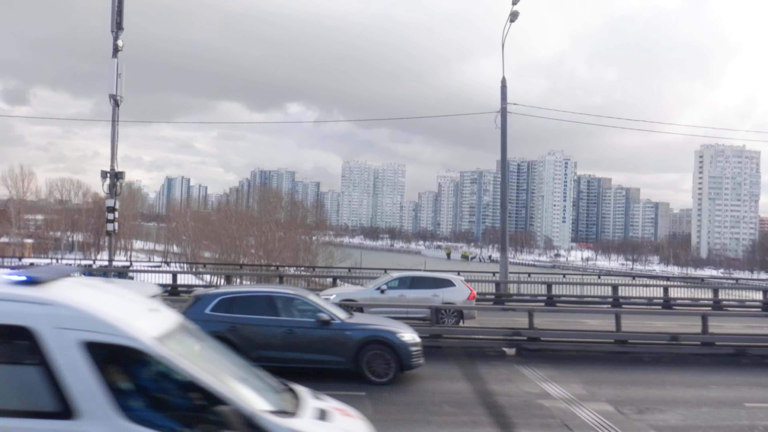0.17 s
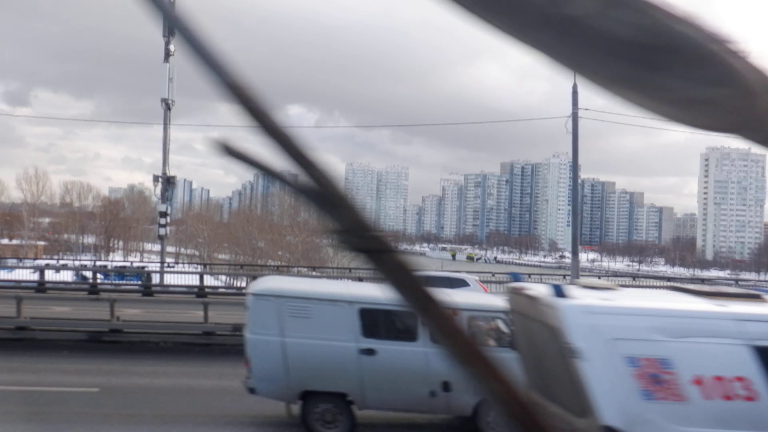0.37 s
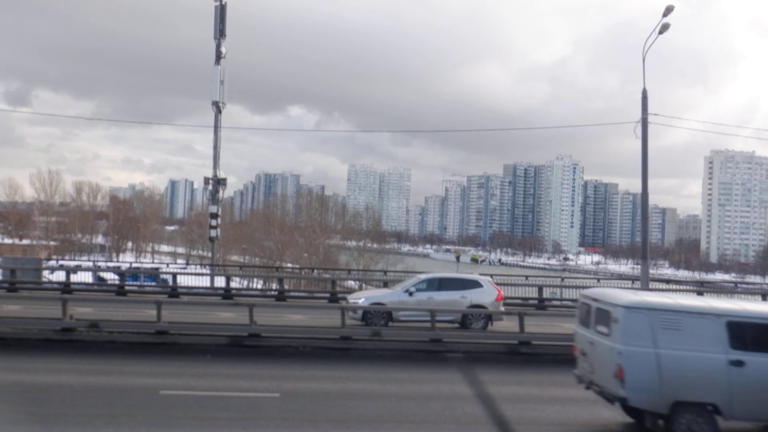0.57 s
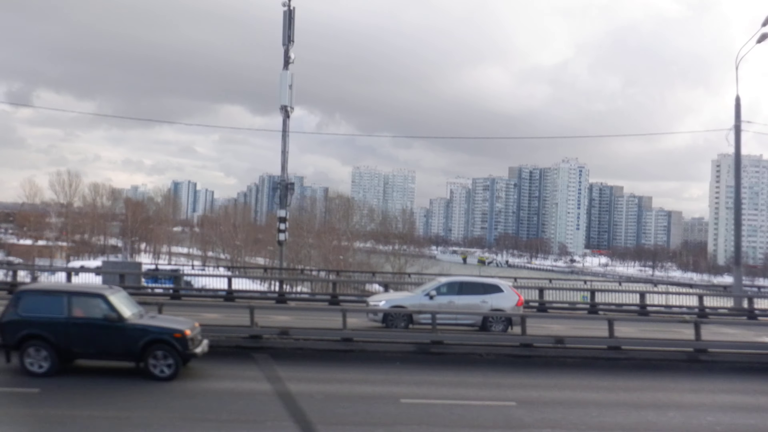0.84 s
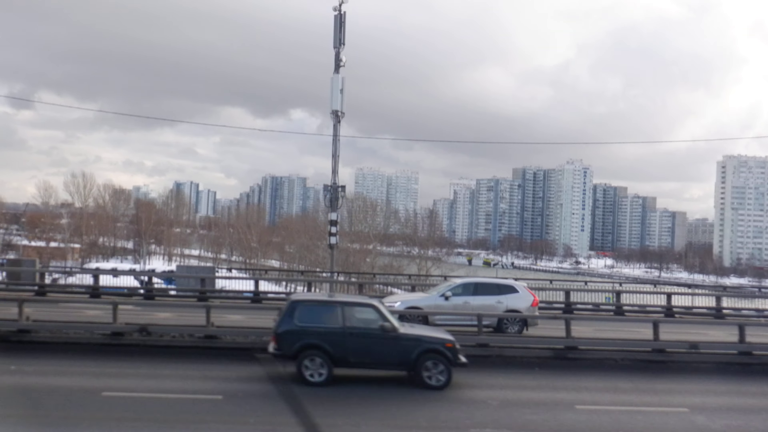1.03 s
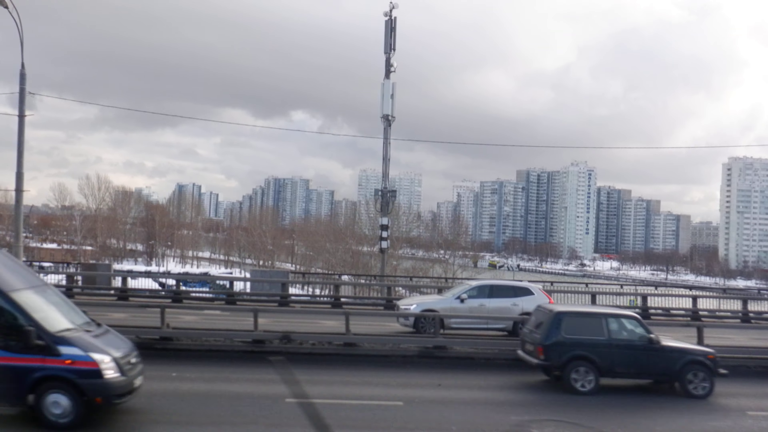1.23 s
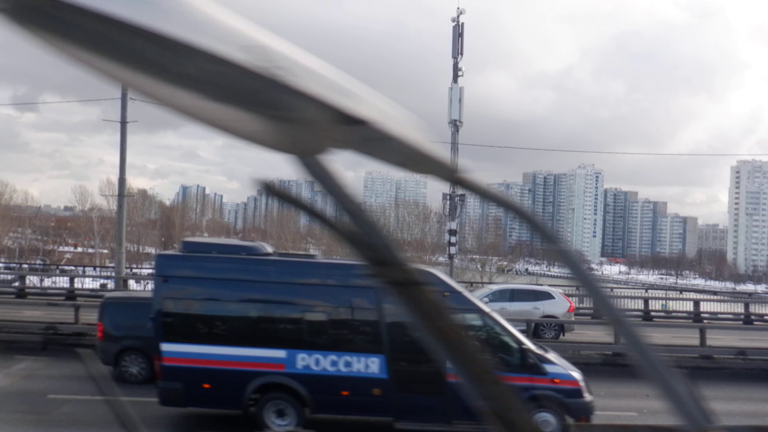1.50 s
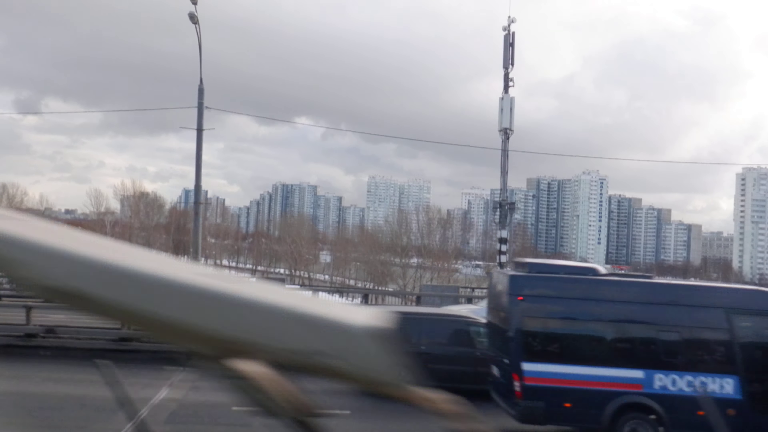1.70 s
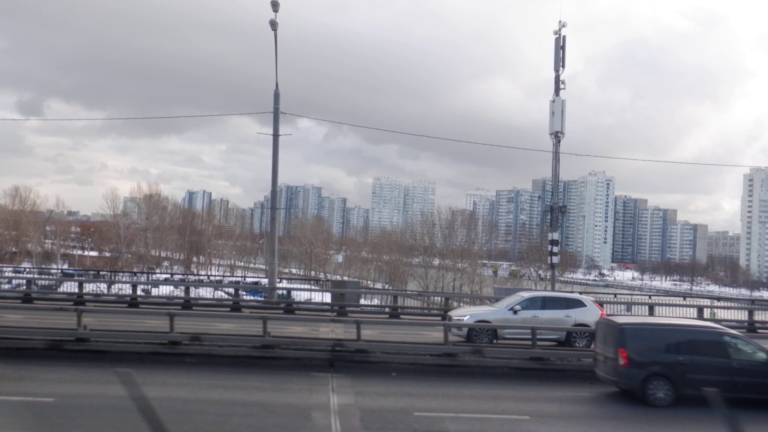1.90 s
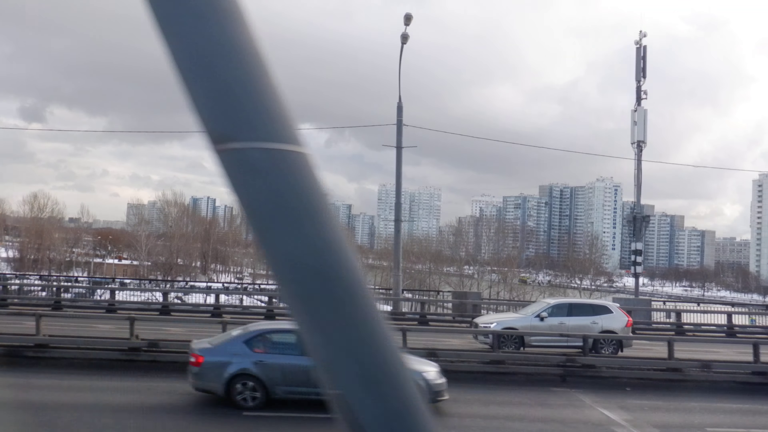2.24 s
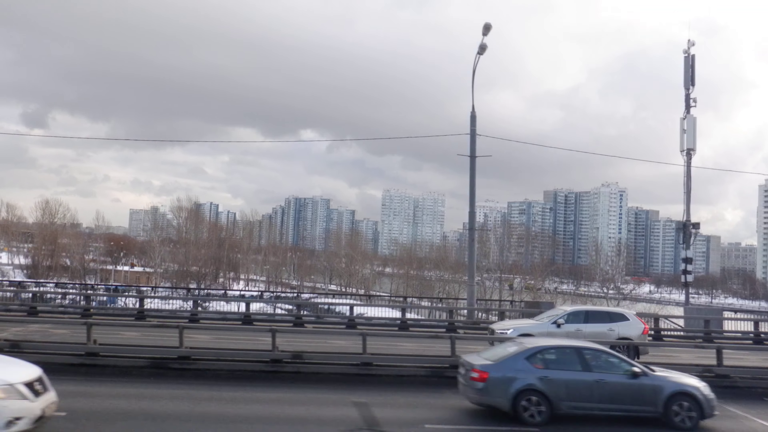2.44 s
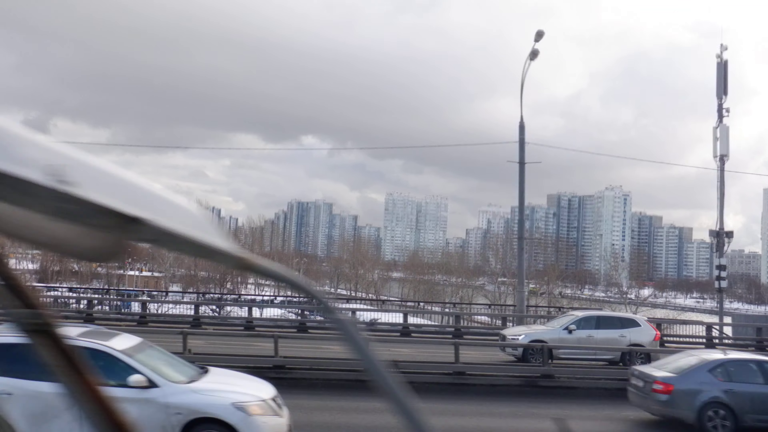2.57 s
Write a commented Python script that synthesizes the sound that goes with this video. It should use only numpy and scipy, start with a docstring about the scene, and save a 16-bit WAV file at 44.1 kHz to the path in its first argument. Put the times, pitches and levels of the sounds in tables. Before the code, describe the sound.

A train rolls steadily, heard inside the car: deep rumble, low drone and softer midrange rush. A floor boom and clatter come at once, with stronger hits around 0.1, 0.75-0.9, 1.55 and 2.4 seconds and smaller thuds between. A loose fitting ticks sharply twice near 0.4 and harder at 0.55. Very faint high ticks pulse nearby; loud booms overload and briefly duck the sound.

```python
"""A steady rumble and rush fill a moving train car, and a floor boom with clatter comes at once.
More booms and clatter follow as axle pairs cross rail joints: shaken resonances and noise bursts.
A faint high tick near the microphone, a puff of high noise, keeps to a regular beat with gaps.
A loose fitting ticks three times: a sharp contact, a short ring of sines and a noisy tail.
Loud booms overload the recorder: it turns the level down, then squeezes the highest peaks."""
import sys
import numpy as np
from scipy import signal
from scipy.io import wavfile
from scipy.ndimage import uniform_filter1d

SR = 44100
rng = np.random.default_rng(int(sys.argv[2]) if len(sys.argv) > 2 else 0)


def waveform_to_disk(signal):
    """Save audio, clipped to [-1, 1], as 16-bit WAV at the path in sys.argv[1]."""
    frames = np.transpose(np.atleast_2d(signal))
    scaled = np.clip(frames, -1, 1) * 32767
    samples = np.round(scaled).astype(np.int16)
    wavfile.write(sys.argv[1], SR, samples)


N = 121275
T = np.arange(N) / SR

# All levels in the tables are those before the recorder.
# Wheels on rails over time: start_s, rumble_level_db, rush_level_db, drone_level_db
ROLLING_LEVELS = [(0.0, -17.5, -33.5, -21.5), (0.1, -18.5, -32.5, -27), (0.3, -22, -36, -27),
                  (0.53, -22.5, -33, -21), (0.56, -20, -33.5, -30), (0.73, -21.5, -32, -18),
                  (0.83, -12.5, -30.5, -38), (0.9, -18.5, -33, -23), (1.0, -24.5, -38, -27),
                  (1.26, -20.5, -34.5, -22.5), (1.44, -17, -30.5, -22.5), (1.81, -20.5, -34, -26),
                  (1.83, -24, -37.5, -19.5), (1.9, -19, -35.5, -27.5), (2.05, -17.5, -32, -19),
                  (2.17, -17, -32.5, -26.5), (2.38, -17, -31, -21), (2.43, -20, -35, -27.5),
                  (2.73, -17, -34, -30.5), (2.75, -22, -34, -23)]
# Tone color of the low rumble: pitch_hz, level_db (per Hz)
RUMBLE_TONE = [(15, -25.5), (30, -25), (60, -8.5), (100, -9), (160, 1), (220, 4), (300, -2.5), (400, -8),
               (550, -10.5), (750, -22), (1200, -80.5)]
# Tone color of the higher rush: pitch_hz, level_db (per Hz)
RUSH_TONE = [(300, -13), (600, 3), (900, 6), (1600, -0.5), (1900, -4), (2500, -4), (3200, -3.5),
             (3700, -11.5), (4200, -19.5), (4800, -17.5), (6200, -19.5), (7200, -36.5), (8500, -40),
             (10000, -46), (16000, -54.5)]
# Faint hiss over time, before its treble is softened: start_s, level_db
HISS_LEVELS = [(0.03, -82), (0.18, -85.5), (0.52, -83.5), (1.07, -85), (1.42, -82), (1.55, -84.5),
               (1.76, -91), (2.25, -82), (2.41, -89), (2.72, -88)]
# Booms of the floor: start_s, level_db, pitch_hz, width_hz (of each resonance), hold_s (rise included)
FLOOR_BOOMS = [(.0, -17, 284, 109.6, 0.02), (0.081, -9, 205, 150, 0.03), (0.126, -11, 270, 110, 0.048),
               (0.291, -18, 255, 150, 0.048), (.455, -16.5, 191, 110, 0.019),
               (0.606, -20.5, 403, 152, 0.024), (0.73, -12, 235, 150, 0.023),
               (0.772, -10.5, 223, 109, 0.031), (0.878, -10, 238, 149, 0.041), (.92, -15, 204, 151, 0.079),
               (1.26, -13.5, 153, 110, 0.056), (1.413, -15.5, 225, 91, 0.042),
               (1.546, -6.5, 238.6, 109.5, 0.042), (1.555, -17, 412, 250, .02),
               (1.701, -13.5, 271, 200, 0.037), (1.971, -14.5, 206.5, 112, 0.042),
               (2.027, -20, 290, 200, 0.01), (2.253, -16.5, 186, 108, 0.024),
               (2.309, -16.5, 190, 111, 0.12), (2.37, -13.5, 380, 300, 0.016), (2.386, -8, 228, 130, 0.027),
               (2.514, -12, 245, 106.7, 0.043), (2.664, -17, 234, 107, 0.044),
               (2.705, -17.5, 242, 110, 0.038)]
# Clatter at the rail joints: start_s, level_db (upper part), rise_s, fade_s (to fall 60 dB),
# mid_db (lower part, compared with the upper part)
JOINT_CLATTER = [(.0, -31, 0.0035, 0.6, -19), (0.094, -28, 0.011, 0.33, -9),
                 (0.131, -25, 0.0051, 0.28, 6.5), (0.273, -32.5, 0.016, .5, 8),
                 (0.589, -34.5, 0.018, 0.23, 8), (0.734, -36.5, .008, 1, 11), (.785, -28, 0.0098, 0.88, -3),
                 (.88, -34, 0.012, 0.42, -4), (.94, -31.5, 0.017, 0.44, 4.5),
                 (1.238, -30, 0.036, 0.58, 3.5), (1.41, -53.5, .03, .5, -2),
                 (1.551, -29.5, 0.0098, 0.38, 7), (1.698, -29, 0.019, 0.46, -3),
                 (2.018, -39, 0.013, 0.16, 12.5), (2.148, -40.5, .03, 0.3, 2),
                 (2.373, -23, 0.024, 0.32, -8), (2.52, -28.5, .028, 0.45, -2.5)]
# Tone color of the clatter: pitch_hz, level_db (per Hz)
CLATTER_COLOR = [(300, 4.5), (500, 2), (900, 0), (1600, -0.5), (1900, -4), (3200, 0), (3700, -9),
                 (4200, -17), (4800, -13), (6200, -19), (7200, -31), (8500, -44), (10000, -55.5),
                 (16000, -72)]
# Faint high ticks: start_s, level_db
HIGH_TICK_TIMES = [(0.0204, -67), (0.0872, -62.5), (0.2892, -70), (0.4204, -71), (0.6878, -68.5),
                   (0.8205, -68), (0.8864, -71), (0.9547, -69), (1.0216, -68), (1.0874, -68), (1.1543, -69),
                   (1.2875, -64.5), (1.4207, -62.5), (1.6871, -74), (1.8206, -67), (1.8871, -72),
                   (1.956, -69), (2.0238, -69), (2.0877, -66), (2.155, -63.5), (2.287, -66), (2.6893, -71)]
# Ticks of the loose fitting: start_s, level_db, contact_db (compared with that level)
FITTING_TICKS = [(.3968, -9, -45), (.4138, -14, -50), (.5475, -6, -19)]
# Tones the fitting rings with: pitch_hz, level_db (compared with each other), fade_s (to fall 60 dB)
FITTING_TONES = [(2250, -1, .015), (2850, 1, .035), (3400, -1, .012), (3950, -2, .01), (4750, 0, .011),
                 (5300, -3, .01), (5900, 2, .009), (6600, -6, .007), (8000, -17, .008)]
# Centers of narrow notches in the finished sound: pitch_hz
NOTCH_PITCHES = [1786, 3428, 3571, 3643, 4286, 4500]

DRONE_TOP_HZ, HISS_TOP_HZ = 140.5, 14000
BOOM_TOP_HZ, BOOM_RISE_S, BOOM_FALL_S = 1530, 0.0037, 0.023
STEADY = 0.41  # how even the shudder is, 0 to 1
CLATTER_SPLIT_HZ = 1170  # between the lower and upper parts
PANEL_HZ, PANEL_WIDTH_HZ, PANEL_DB = 1624, 59, -3.5  # a panel that rings with the clatter
HIGH_TICK_HZ, HIGH_TICK_WIDTH_HZ, HIGH_TICK_S = 11600, 900, 0.008
TICK_LOW_HZ, TICK_TOP_HZ = 1500, 6800
RATTLE_DB, RATTLE_FADE_S = -27, 0.035  # noisy tail, compared with the peak of the ring
DUCK_FROM_DB, DUCK_SHARE = -12, 0.26  # share of the excess dB that is turned down
MEMORY_FALL_DB_PER_S = 18  # how fast the recorder forgets a loud moment
KNEE, SQUEEZE = 0.72, 0.55  # sample size where squeezing starts; share kept above it
NOTCH_WIDTH_HZ, EDGE_HZ = 40, 15850


def gain_of(db):
    """Turns decibels into a multiplier for the wave."""
    return 10 ** (np.asarray(db) / 20)


def evened(x):
    """Scales a sound so its average strength (rms) is 1."""
    return x / np.sqrt(np.mean(x ** 2) + 1e-20)


def band(x, order, low_hz, high_hz):
    """Keeps the sound between two pitches and weakens the rest."""
    return signal.sosfilt(signal.butter(order, [low_hz, high_hz], "band", fs=SR, output="sos"), x)


def noise(tone, patchy_db, size=1024):
    """Noise of a given tone color, with patches that drift in time and pitch."""
    frames, hz = 4 * N // size + 5, np.fft.rfftfreq(size, 1 / SR)
    a, b, patch = rng.standard_normal((frames, len(hz), 3)).T
    patch = uniform_filter1d(patch, size=8, axis=0)
    patch = evened(uniform_filter1d(patch, size=8, axis=1))
    tone_hz, tone_db = np.transpose(tone)
    color_db = np.interp(np.log(hz + 1), np.log(tone_hz), tone_db)
    spectrum = (a + 1j * b) * gain_of(color_db[:, None] + patchy_db * patch)
    x = signal.istft(spectrum, nperseg=size, noverlap=size * 3 // 4)[1]
    return evened(x[:N])


def resonate(x, hz, width_hz):
    """One resonance: lets through sound near one pitch, with gain 1 at its center."""
    turn = np.exp(2j * np.pi * hz * np.arange(len(x)) / SR)
    r = np.exp(-np.pi * width_hz / SR)
    # shift the pitch down to zero, smooth, and shift it back
    return 2 * (turn * signal.lfilter([1 - r], [1, -r], x / turn)).real


def add(mix, s, sound):
    """Lays a sound into the mix at time s, cut off at the end of the mix."""
    part = mix[max(round(s * SR), 0):][:len(sound)]
    part += sound[:len(part)]


def rolling():
    """Wheels on rails: rumble and rush swell on their curves over a deep drone and faint hiss."""
    s, rumble_db, rush_db, drone_db = np.transpose(ROLLING_LEVELS)
    rumble = gain_of(np.interp(T, s, rumble_db)) * noise(RUMBLE_TONE, 0.78, size=2048)
    rush = gain_of(np.interp(T, s, rush_db)) * noise(RUSH_TONE, 1.3)
    drone = evened(band(rng.standard_normal(N), 3, 40, DRONE_TOP_HZ))
    drone = gain_of(np.interp(T, s, drone_db)) * drone
    hiss = signal.lfilter(*signal.butter(1, HISS_TOP_HZ, fs=SR), rng.standard_normal(N))
    hiss = gain_of(np.interp(T, *np.transpose(HISS_LEVELS))) * hiss
    return rumble + rush + drone + hiss


def booms():
    """The floor shudders briefly around one pitch: rise, hold, quick fall."""
    out, t = np.zeros(N), np.arange(SR // 4) / SR
    warmup = 2000  # samples for the resonances to settle, then cut away
    for s, db, hz, width_hz, hold_s in FLOOR_BOOMS:
        shake = rng.standard_normal(len(t) + warmup)
        shake = resonate(resonate(shake, hz, width_hz), hz, width_hz)
        # partly level out the swings in strength
        swing = abs(signal.hilbert(evened(shake)))
        shake = (shake / (swing + 0.22) ** STEADY)[warmup:]
        shake = shake / np.sqrt(np.mean(shake[t < hold_s] ** 2))
        rise = np.minimum(t / BOOM_RISE_S, 1)
        fall = np.exp(-np.maximum(t - hold_s, 0) / BOOM_FALL_S)
        add(out, s, gain_of(db) * shake * rise * fall)
    return band(out, 4, 60, BOOM_TOP_HZ)


def clatter():
    """Broadband bursts swell fast and fade, some heavier in the midrange; a panel rings along."""
    upper_power, lower_power, t = np.zeros(N), np.zeros(N), np.arange(SR) / SR
    for s, db, rise_s, fade_s, mid_db in JOINT_CLATTER:
        fading_db = db - 60 * np.maximum(t - rise_s, 0) / fade_s
        # twice the dB gives power, so overlapping bursts add as noise does
        power = gain_of(2 * fading_db) * np.minimum(t / rise_s, 1) ** 2
        add(upper_power, s, power)
        add(lower_power, s, power * gain_of(2 * mid_db))
    x = noise(CLATTER_COLOR, 1.1, size=512)
    x = x + gain_of(PANEL_DB) * resonate(x, PANEL_HZ, PANEL_WIDTH_HZ)
    lower = signal.sosfiltfilt(signal.butter(2, CLATTER_SPLIT_HZ, fs=SR, output="sos"), x)
    upper = x - lower
    return (np.sqrt(lower_power) * lower + np.sqrt(upper_power) * upper) / np.std(upper)


def high_ticks():
    """Short soft puffs: noise passed twice through one high resonance, swelling and fading."""
    out, t = np.zeros(N), np.arange(600) / SR
    swell = np.sin(np.pi * np.minimum(t / HIGH_TICK_S, 1))
    for s, db in HIGH_TICK_TIMES:
        puff = resonate(rng.standard_normal(len(t)), HIGH_TICK_HZ, HIGH_TICK_WIDTH_HZ)
        puff = evened(resonate(puff, HIGH_TICK_HZ, HIGH_TICK_WIDTH_HZ))
        add(out, s, gain_of(db) * puff * swell)
    return out


def fitting_ticks():
    """A loose fitting is struck: a sharp contact, a short ring of fading tones and a noisy tail."""
    out, t = np.zeros(N), np.arange(3000) / SR
    ring = sum(gain_of(db - 60 * t / fade_s) * np.sin(2 * np.pi * hz * t)
               for hz, db, fade_s in FITTING_TONES)
    ring = ring / abs(ring).max()
    contact = t == 4 / SR  # a click one sample long
    for s, db, contact_db in FITTING_TICKS:
        rattle = gain_of(RATTLE_DB - 60 * t / RATTLE_FADE_S) * rng.standard_normal(len(t))
        body = band(ring + rattle, 4, TICK_LOW_HZ, TICK_TOP_HZ)
        add(out, s, gain_of(db) * (body + gain_of(contact_db) * contact))
    return out


def scene():
    """All sources together, in one channel."""
    return (rolling() + booms() + clatter() + high_ticks() + fitting_ticks())[None]


def duck(dry):
    """Gain control: loud moments turn the level down, and it slowly comes back."""
    power_db = 10 * np.log10(abs(uniform_filter1d(dry[0] ** 2, size=900)) + 1e-12)
    # remember the loudest moment so far, letting that memory fall steadily
    fall = T * MEMORY_FALL_DB_PER_S
    remembered_db = np.maximum.accumulate(power_db + fall) - fall
    over_db = np.maximum(remembered_db - DUCK_FROM_DB, 0)
    smoother = np.hanning(1500) / np.hanning(1500).sum()
    return dry / gain_of(DUCK_SHARE * signal.oaconvolve(over_db, smoother)[:N])


def squeeze(x):
    """Overload: the part of a peak above a hard knee is made smaller."""
    squeezed = np.sign(x) * (KNEE + SQUEEZE * (abs(x) - KNEE))
    return np.where(abs(x) > KNEE, squeezed, x)


def record(dry):
    """Gain control and overload of the recorder; then narrow notches and a cut of the highest treble."""
    x = squeeze(duck(dry))
    for hz in NOTCH_PITCHES:
        x = signal.lfilter(*signal.iirnotch(hz, hz / NOTCH_WIDTH_HZ, fs=SR), x)
    treble_cut = signal.firwin(511, EDGE_HZ, window=("kaiser", 9), fs=SR)
    return signal.oaconvolve(x, treble_cut[None], "same")


dry = scene()
out = record(dry)
waveform_to_disk(out)
```